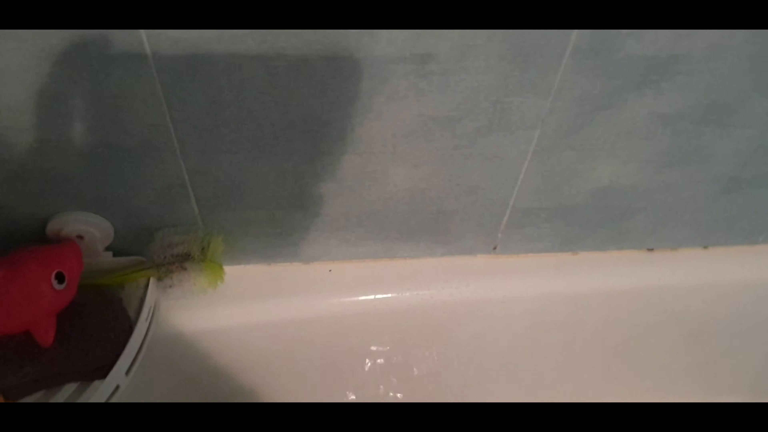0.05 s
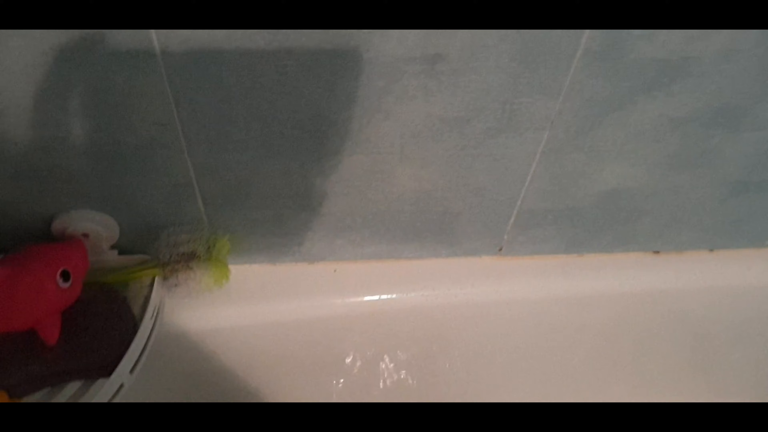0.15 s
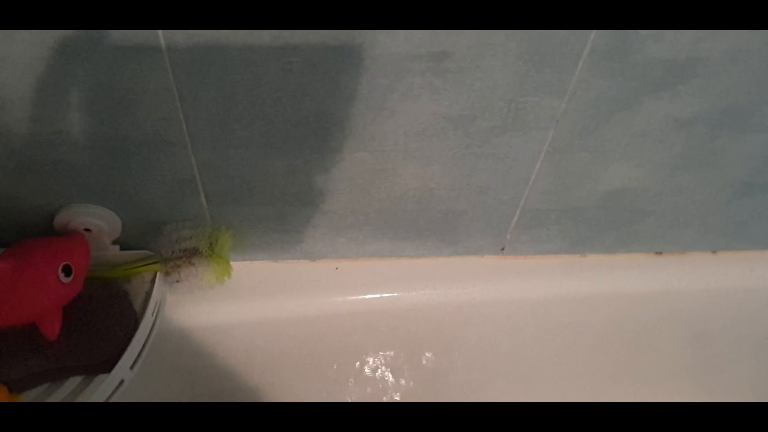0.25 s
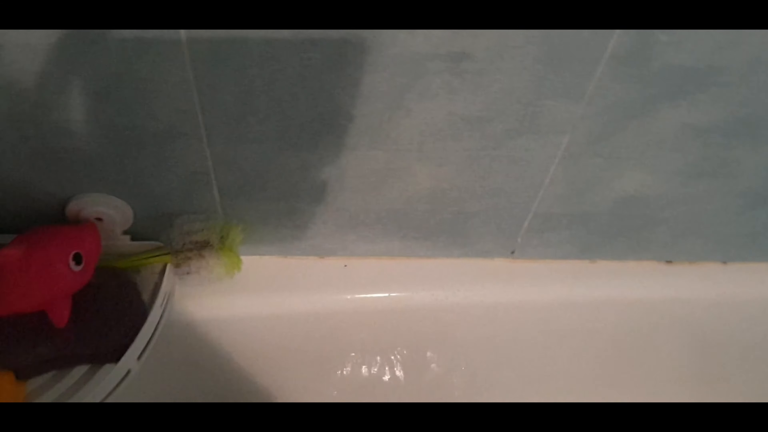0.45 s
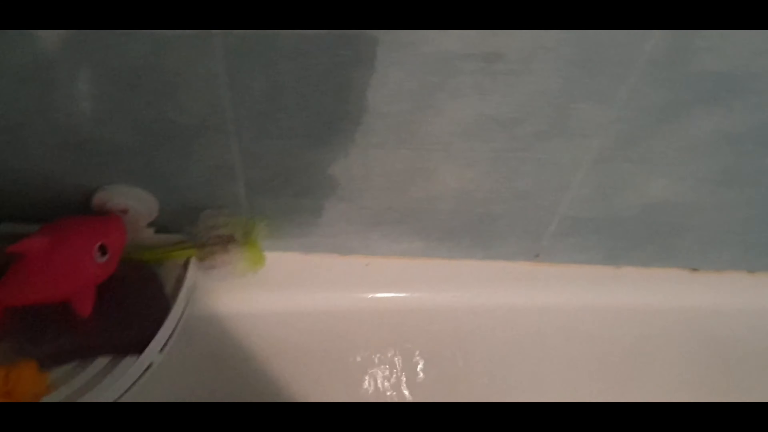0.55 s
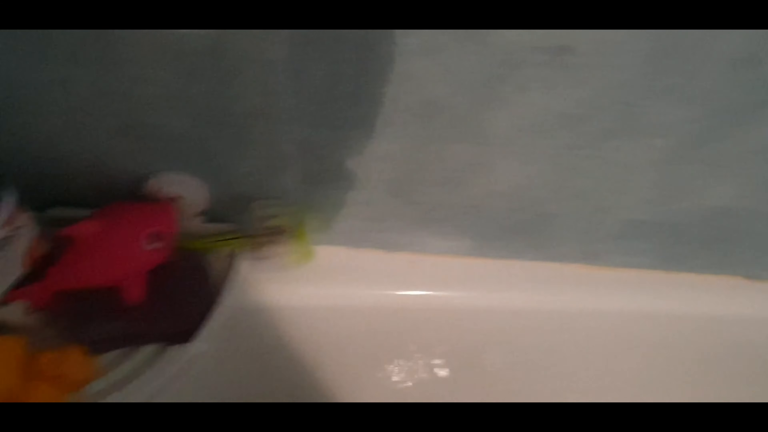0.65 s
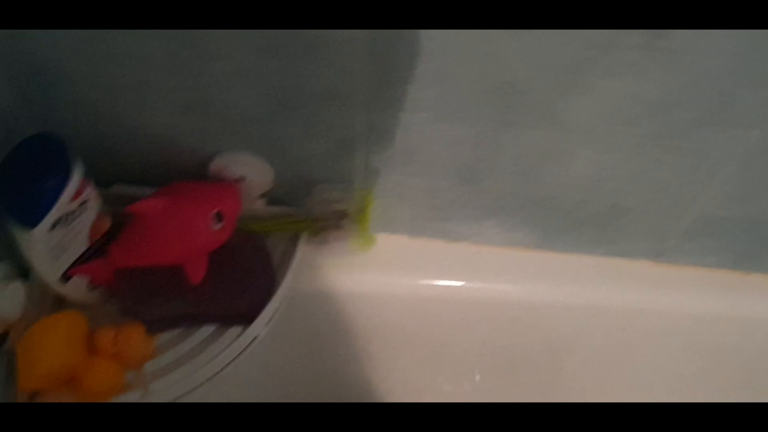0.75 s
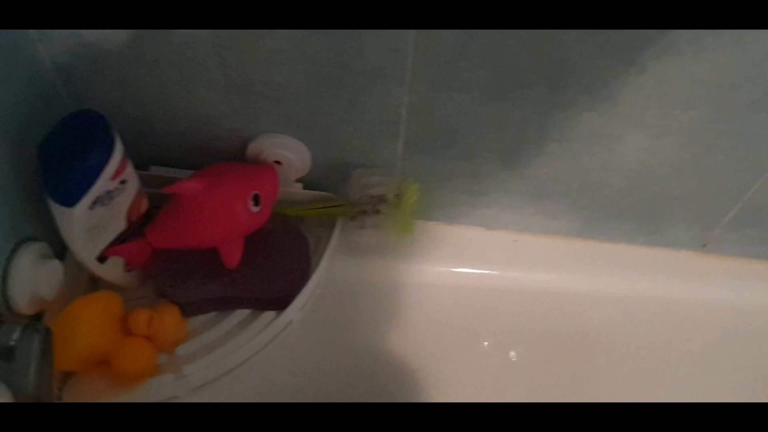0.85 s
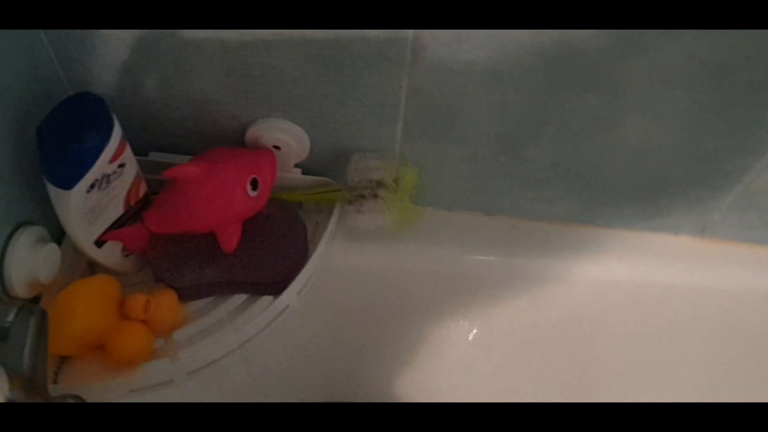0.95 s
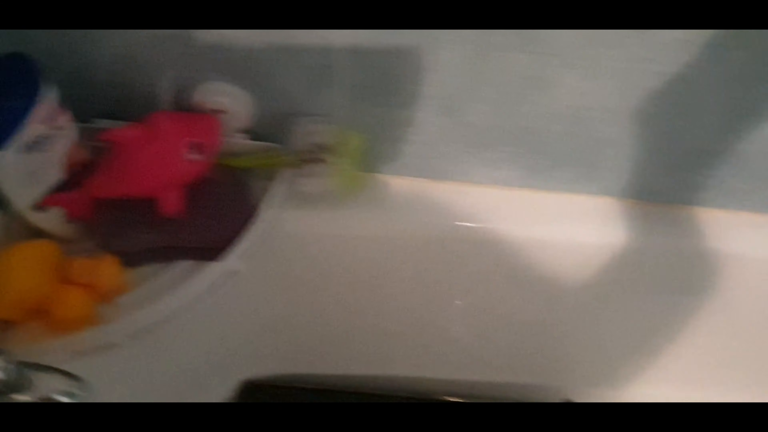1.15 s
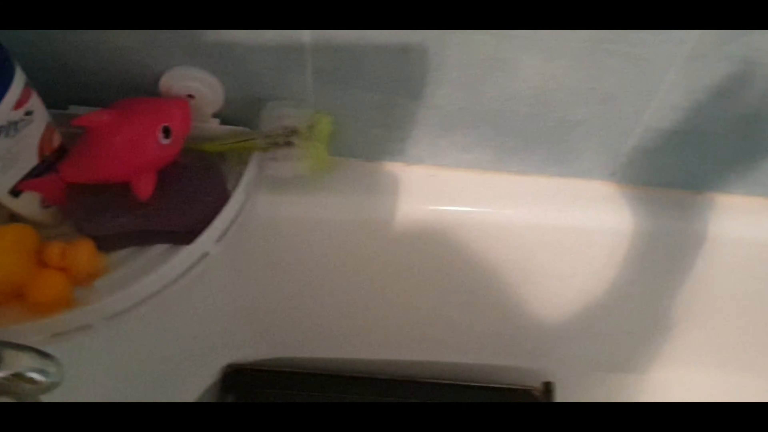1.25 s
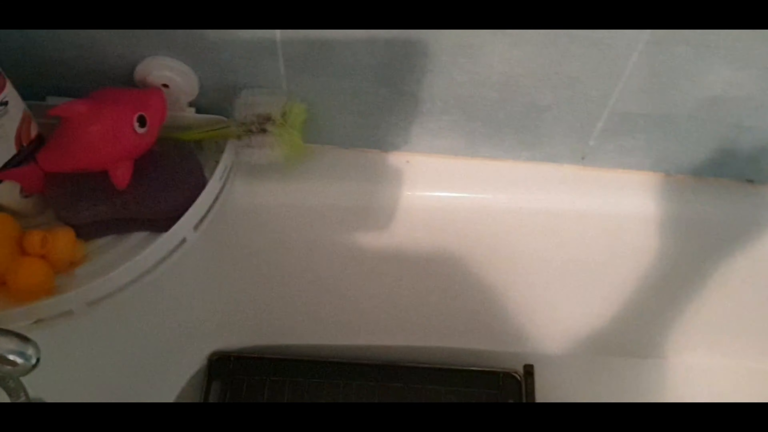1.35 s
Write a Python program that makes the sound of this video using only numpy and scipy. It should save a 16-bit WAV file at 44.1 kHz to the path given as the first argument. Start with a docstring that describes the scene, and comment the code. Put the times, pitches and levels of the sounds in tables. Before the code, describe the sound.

Something hard clacks against a bathtub with a hollow boom, then plastic clicks and taps lightly.

```python
"""Bathtub bump in a tiled bathroom

Something hard knocks the tub: it clacks, chatters and rings while the tub booms with a hollow tone.
Plastic clicks and rustles close to the left microphone; light hollow objects get dull taps.
Contacts are shaped noise bursts that the tiles answer, rings are sums of damped modes.
Soft thuds, a faint rumble and a little hiss lie underneath."""
import sys
import numpy as np
from scipy import signal
from scipy.fft import rfft, irfft, next_fast_len
from scipy.io import wavfile

SR = 44100
rng = np.random.default_rng(int(sys.argv[2]) if len(sys.argv) > 2 else 0)


def transcribe(signal):
    """Save signal, clipped to [-1, 1], as a 16-bit WAV file at the path in sys.argv[1]."""
    frames = np.atleast_2d(signal).T
    limited = np.clip(frames, -1, 1)
    pcm = np.round(limited * 32767).astype(np.int16)
    wavfile.write(sys.argv[1], SR, pcm)


N = 61739
T = np.arange(N) / SR
FFT_SIZE = next_fast_len(2 * N)
HZ = np.fft.rfftfreq(FFT_SIZE, 1 / SR)

# Levels are relative within each table; a positive tilt brightens, a positive pan leans left.
# decay of the tiled room: f/Hz, t60/s
ROOM_DECAY = [(80, 1.02), (300, 0.74), (800, 0.38), (2500, 0.4168), (6000, 0.25), (11000, 0.27),
              (15000, 0.1753)]
# how alike the room sounds in the two microphones: f/Hz, correlation
ROOM_CORRELATION = [(80, 0.82), (300, 0.98), (600, 0.62), (1100, 0.082), (2300, 0.026), (5000, 0.021),
                    (15000, -0.37)]
# leftward lean of the room sound: f/Hz, pan/dB
ROOM_PAN = [(60, 2.8), (150, 8.6), (500, 8.9), (2000, 2.5), (5000, 4.6), (12000, 9.6)]
# colour of the rumble and hiss: f/Hz, level/dB
ROOM_TONE_EQ = [(20, -11), (50, 0), (90, 9.5), (170, 5), (260, -5), (500, -3), (1000, -11.5), (2500, -25.5),
                (6000, -20), (11000, -28), (15000, -22)]
# swells and dips of the rumble and hiss: t/s, level/dB
ROOM_TONE_RIDE = [(0, -49.5), (.7, -53.5), (.81, -62.5), (.88, -53.5), (1.0, -50.5), (1.15, -55.5),
                  (1.4, -52.5)]
# soft low thuds: t/s, level/dB
THUD_CUES = [(0.666, -46), (0.756, -46.5), (0.863, -44.5), (1.072, -58), (1.16, -46.5)]
# bassy colour of a thud: f/Hz, level/dB
THUD_EQ = [(30, -11), (60, -7), (90, 10), (170, 2), (260, -18), (600, -24.5), (3000, -53.5)]
# light taps: t/s, level/dB, tilt/(dB/octave), ring trim/dB
TAP_CUES = [(0.502, -38.5, 5, -25), (0.9389, -38.5, 1.5, 7.5), (0.955, -42, -1.5, -8), (1.019, -55, 3, 0),
            (1.1028, -35, 6.5, 0), (1.114, -35, 6.5, -39), (1.167, -35, 7, -7.5), (1.195, -45.5, 7, -11),
            (1.2816, -39, -0.5, 5.5), (1.318, -46.5, -3, -8)]
# dull colour of a tap: f/Hz, level/dB
TAP_EQ = [(60, -10.5), (200, -14), (400, -14), (650, -5.5), (1000, -3), (1600, -6.5), (2000, -11.5),
          (2600, -12.5), (4000, -16), (8000, -26), (15000, -48)]
# modes of the tapped hollow plastic: f/Hz, level/dB, t60/s
HOLLOW_MODES = [(409, -19, .6), (441, -17, .35), (624, -8, .35), (921, -14, .27), (1007, -14, .35),
                (1220, -12, .25), (1400, -11, .2), (1663, -14, .2)]
# plastic rustles: t/s, length/s, level/dB, tilt/(dB/octave)
RUSTLE_CUES = [(0.251, 0.042, -26.5, -13.5), (0.501, 0.0029, -32.5, 5), (0.506, 0.033, -38.5, -6),
               (0.623, 0.061, -45.5, 0), (0.694, 0.11, -55.5, -6), (1.055, 0.034, -48.5, -9.5),
               (1.298, 0.026, -48, -2.5), (1.382, .015, -41, 0)]
# close plastic clicks: t/s, level/dB, tilt/(dB/octave), reverb trim/dB
CLICK_CUES = [(0.0967, -47, -5, 7), (0.1597, -40.5, -2.5, 7), (0.2233, -20.5, 0, 10.5),
              (0.2262, -21.5, -4, -19), (0.2309, -33.5, -9.5, 15), (0.2326, -11.5, 1.5, -10),
              (0.607, -29, 3, 2.5), (0.6253, -30, 4.5, -30), (0.772, -47, 0.5, 8.5),
              (0.8835, -29.5, 6.1, 7), (0.9398, -31, -8.5, 4), (1.047, -39, -5.5, 9.5),
              (1.0812, -22.5, 4, -0.5), (1.1117, -8.5, 0.45, 0), (1.1226, -27.5, -7.5, 6.5),
              (1.311, -35, 0, 4.5), (1.3932, -33, -6, 10.5)]
# bright colour of clicking and rubbed plastic: f/Hz, level/dB
PLASTIC_EQ = [(60, -60), (400, -28), (1500, -23), (2400, -16.5), (3300, -9), (5000, -5.5), (6300, -3.5),
              (8500, -3.5), (11000, 1.5), (12500, 2.5), (14000, -2), (15500, 5.5)]
# bumps on the tub: t/s, tub level/dB, clack level/dB, clack tilt/(dB/octave)
BUMP_CUES = [(-0.012, -39, -38, -2), (0.041, -38.5, -42, -3.5), (0.097, -42, -45.5, -3.5),
             (0.2700, -18.5, -18.5, 2.5), (0.664, -50.5, -51.5, 1)]
# first contact and rebounds within a bump: delay/s, level/dB
CHATTER_HITS = [(0, -2), (.0075, -3.5), (0.0208, -10)]
# colour of the hard clack against the tub: f/Hz, level/dB
CLACK_EQ = [(25, -38.5), (50, -23.5), (100, -8), (170, 5.5), (260, -10), (450, 4.5), (700, -0.5),
            (1050, 0.5), (1600, -7), (2250, -0.5), (3100, -4.5), (3500, -8), (4100, -8), (4700, -14),
            (5500, -15), (9000, -26.5), (15000, -26)]
# modes of the hard object: f/Hz, level/dB, t60/s
OBJECT_MODES = [(1200, -6, .05), (1513, -21, .3), (2132, -9, .22), (2237, -11, .21), (2385, -9, .2),
                (2518, -14, .21), (2852, -14, .25), (3115, -11, .18), (3277, -17, .25), (3957, -19, .2),
                (4050, -9, .07)]
# modes of the tub: f/Hz, level/dB, t60/s
TUB_MODES = [(102.5, -18, .8), (123.5, -12, .6), (134, -15, .35), (210, -14, .5), (315, -2, .66),
             (321, -5, .2), (469, -13, .58), (480, -3, .09), (523, -12, .38), (623, -18, .45),
             (748, -17, .48), (858, -15, .33), (983, -16, .36), (1040, -15, .34)]

TUB_PAN_DB, OBJECT_PAN_DB = 3.2, 3.5


def amp(db):
    """Decibels to gain."""
    return 10 ** (np.asarray(db) / 20)


def curve_at(points, hz):
    """Read a curve of (f/Hz, value) points on a log frequency axis."""
    freqs, values = np.transpose(points)
    return np.interp(np.log(hz + 1), np.log(freqs + 1), values)


def pan(db):
    """Left and right gains for a level difference."""
    return amp(np.array([[.5], [-.5]]) * db)


def decay(t60):
    """Exponential envelope, down 60 dB after t60 seconds."""
    return np.exp(-np.log(1000) * T / t60)


def place(out, t, sound):
    """Mix a sound into out from time t on; t may lie before the start."""
    start = round(t * SR)
    part = sound[:, max(0, -start):max(0, N - start)]
    out[:, max(0, start):max(0, start) + part.shape[1]] += part


def normalise(sound, burst_s=.005):
    """Give a sound the energy of a full-level burst lasting burst_s."""
    energy = np.mean(np.sum(sound ** 2, -1))
    return sound * np.sqrt(burst_s * SR / (energy + 1e-20))


def equalise(sound, eq, tilt_db=0):
    """Tilted minimum-phase EQ: nothing rings ahead of the attack."""
    gain = amp(curve_at(eq, HZ) + tilt_db * np.log2((HZ + 300) / 1000))
    cepstrum = irfft(np.log(gain), FFT_SIZE)
    cepstrum[1:FFT_SIZE // 2] *= 2
    cepstrum[FFT_SIZE // 2 + 1:] = 0
    return irfft(rfft(sound, FFT_SIZE) * np.exp(rfft(cepstrum)), FFT_SIZE)[..., :N]


def stereo_angle(hz):
    """Half the phase angle between the microphones that gives the room's correlation."""
    return np.arccos(np.clip(curve_at(ROOM_CORRELATION, hz), -1, 1)) / 2


def diffuse_noise():
    """Noise arriving from all round the room: narrow in the bass, wide in the treble."""
    mid, side = rfft(rng.standard_normal((2, FFT_SIZE)))
    angle = stereo_angle(HZ)
    mid, side = np.cos(angle) * mid, np.sin(angle) * side
    pair = np.array([mid + side, mid - side])
    return irfft(pair * pan(curve_at(ROOM_PAN, HZ)), FFT_SIZE)[:, :N]


def tile_reverb(build_s=.0035):
    """Reflections off the tiles build into a tail that dies faster in the treble."""
    hz, t, bands = signal.stft(diffuse_noise(), SR, nperseg=256)
    damping = amp(-60 * t / curve_at(ROOM_DECAY, hz)[:, None])
    tail = signal.istft(bands * damping, SR, nperseg=256)[1][:, :N]
    return tail * (1 - np.exp(-T / build_s))


def contact(eq, tilt_db, t60, pan_db, reverb_db, lag_s=.0003):
    """A noise burst from the left, reaching the right microphone later, plus the room's answer."""
    burst = normalise(equalise(rng.standard_normal(N) * decay(t60), eq, tilt_db))
    delayed = irfft(rfft(burst, FFT_SIZE) * np.exp(-2j * np.pi * HZ * lag_s), FFT_SIZE)[:N]
    tail = normalise(equalise(tile_reverb(), eq, tilt_db))
    return np.array([burst, delayed]) * pan(pan_db) + amp(reverb_db) * tail


def ring(modes, scatter_db, attack_s=.001):
    """Damped modes, mixed anew at each blow; high ones reach the microphones out of step."""
    tone = np.zeros((2, N))
    for k, (hz, db, t60) in enumerate(modes):
        gain = amp(db + scatter_db * rng.standard_normal())
        phase = (-1) ** k * stereo_angle(hz) * np.array([[1], [-1]])
        tone += gain * decay(t60) * np.sin(2 * np.pi * hz * T + phase)
    return tone * (1 - np.exp(-T / attack_s))


def room_tone():
    """A bed of low rumble and faint hiss whose level dips briefly midway."""
    noise = equalise(diffuse_noise(), ROOM_TONE_EQ)
    ride_db = np.interp(T, *np.transpose(ROOM_TONE_RIDE))
    return noise / noise.std() * amp(ride_db)


def soft_thuds():
    """Soft, heavy contacts that stir the bass of the room."""
    out = np.zeros((2, N))
    for t, db in THUD_CUES:
        place(out, t, amp(db) * contact(THUD_EQ, tilt_db=0, t60=.12, pan_db=3.5, reverb_db=-2))
    return out


def hollow_taps():
    """Light touches on hollow plastic: a dull, roomy knock and a short ring."""
    out = np.zeros((2, N))
    for t, db, tilt_db, ring_db in TAP_CUES:
        knock = amp(-6.5) * contact(TAP_EQ, tilt_db, t60=.02, pan_db=2.5, reverb_db=9)
        body = amp(ring_db - 7) * ring(HOLLOW_MODES, scatter_db=2.5) * pan(OBJECT_PAN_DB)
        place(out, t, amp(db) * (knock + body))
    return out


def plastic_rustles(slips_per_s=900, reverb_db=3.5):
    """Rubbed plastic: a quick run of tiny slips, mostly heard off the walls."""
    out = np.zeros((2, N))
    for t, length, db, tilt_db in RUSTLE_CUES:
        slips = (rng.random(N) < slips_per_s / SR) * rng.choice([-1, 1], N)
        gate = np.clip((length - T) * 1000, 0, 1)  # closes over 1 ms
        grit = (slips + .08 * rng.standard_normal(N)) * gate
        direct = normalise(equalise(grit, PLASTIC_EQ, tilt_db))
        wet = normalise(signal.fftconvolve(direct[None], tile_reverb(), axes=1)[:, :N])
        place(out, t, amp(db) * (direct * pan(4.6) + amp(reverb_db) * wet))
    return out


def plastic_clicks():
    """Plastic snaps sharply right beside the left microphone."""
    out = np.zeros((2, N))
    for t, db, tilt_db, trim_db in CLICK_CUES:
        snap = contact(PLASTIC_EQ, tilt_db, t60=.014, pan_db=23.5, reverb_db=trim_db + 6)
        place(out, t, amp(db) * snap)
    return amp(-16.5) * out


def tub_bumps():
    """Each bump rings both the tub and the hard object, which clacks and chatters against it."""
    out = np.zeros((2, N))
    for t, tub_db, clack_db, tilt_db in BUMP_CUES:
        boom = amp(tub_db) * ring(TUB_MODES, scatter_db=4.5) * pan(TUB_PAN_DB)
        object_db = clack_db + tilt_db - .5  # a brighter clack rings the object harder
        clink = amp(object_db) * ring(OBJECT_MODES, scatter_db=3.5) * pan(OBJECT_PAN_DB)
        place(out, t, boom + clink)
        for delay, hit_db in CHATTER_HITS:
            clack = contact(CLACK_EQ, tilt_db, t60=.02, pan_db=8.5, reverb_db=5)
            place(out, t + delay, amp(clack_db + hit_db) * clack)
    return out


def scene():
    """The stereo mix: tub and plastic in front, thuds and room tone behind."""
    return tub_bumps() + plastic_clicks() + plastic_rustles() + hollow_taps() + soft_thuds() + room_tone()


def record(dry):
    """A steep high cut takes off the topmost air."""
    cutoff_hz = 15450
    return irfft(rfft(dry, FFT_SIZE) / (1 + (HZ / cutoff_hz) ** 120), FFT_SIZE)[:, :N]


dry = scene()
out = record(dry)
transcribe(out)
```